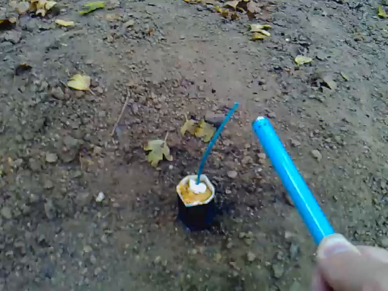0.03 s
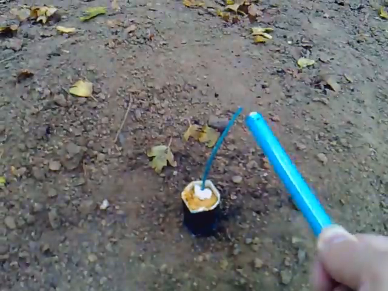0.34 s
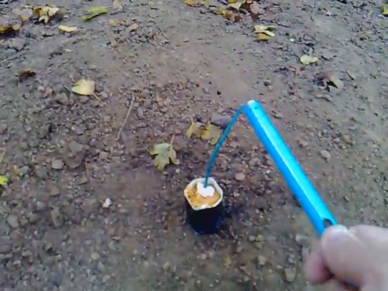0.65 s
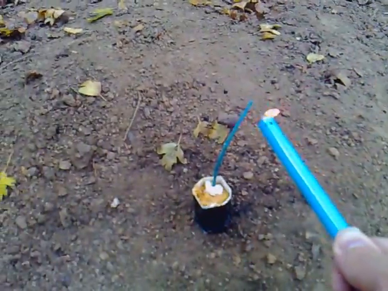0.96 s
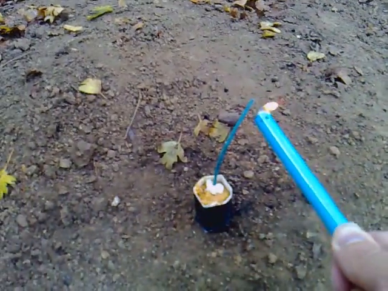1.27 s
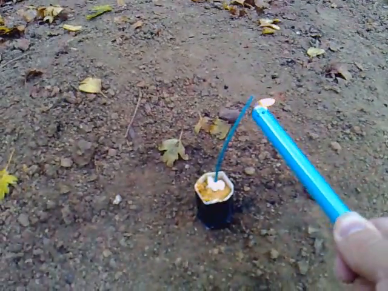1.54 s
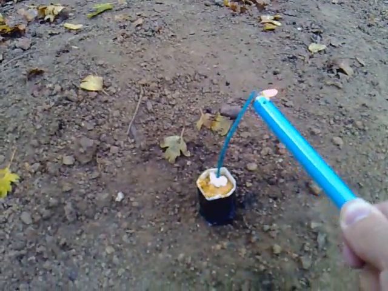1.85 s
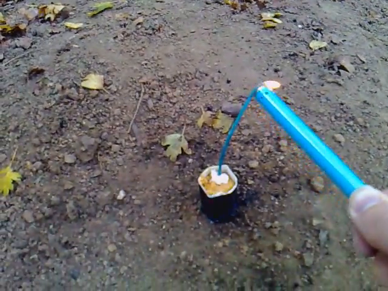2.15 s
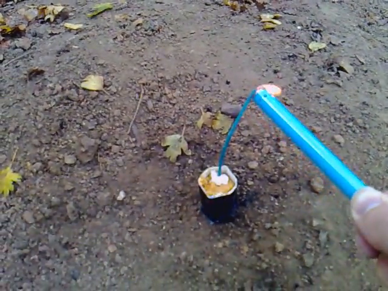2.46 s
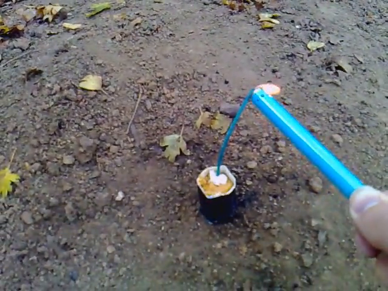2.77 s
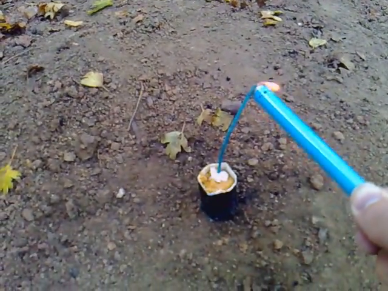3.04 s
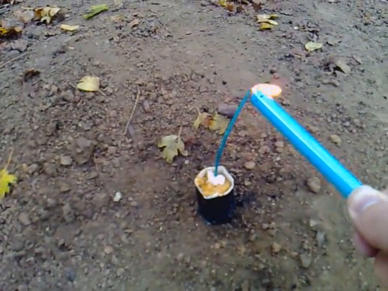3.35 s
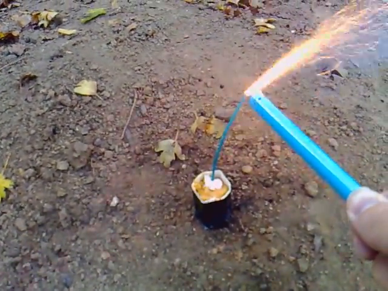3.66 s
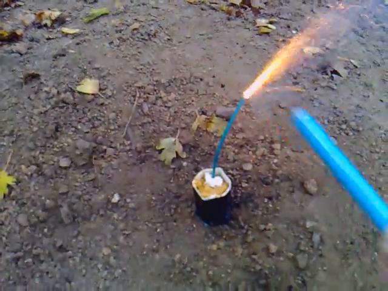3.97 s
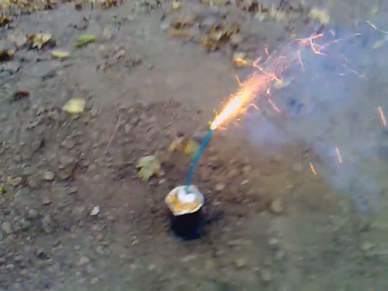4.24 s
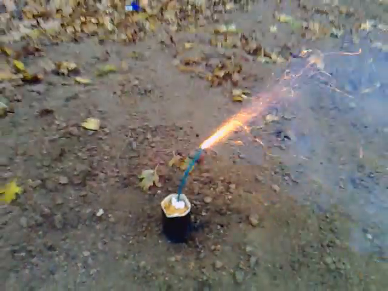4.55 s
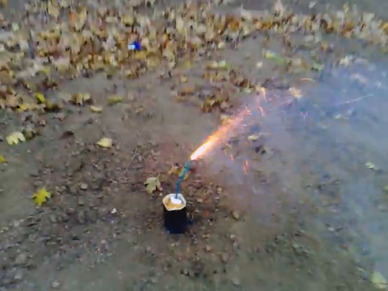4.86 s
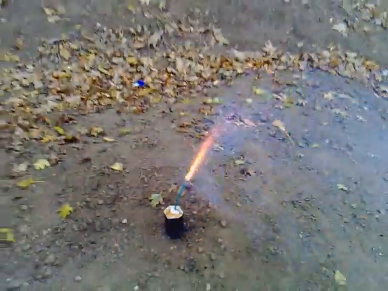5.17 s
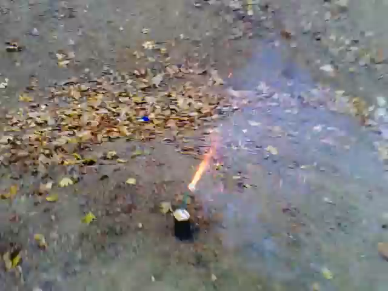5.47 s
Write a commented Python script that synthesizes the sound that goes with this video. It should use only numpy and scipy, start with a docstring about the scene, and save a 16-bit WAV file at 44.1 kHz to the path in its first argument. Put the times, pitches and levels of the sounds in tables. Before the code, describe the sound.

Outdoors, one sharp lighter snap is followed by small crackles, then a smoke bomb's fuse flares into a strong, bright hiss.

```python
"""Lighting a smoke bomb

A long-necked lighter snaps alight, its body ringing, and is held to the fuse of a smoke bomb on bare
earth. Powder grains pop in brief spits; then the fuse catches and its gas jet hisses over a low roar.
The ground echo interferes with the direct sound and gives it a hollow colour. As the small mono
microphone backs away through faint outdoor rumble, the hiss fades and that colour slides upward."""
import sys
import numpy as np
from scipy import signal
from scipy.fft import rfft, irfft
from scipy.io import wavfile
from scipy.ndimage import uniform_filter1d, minimum_filter1d, map_coordinates

SR = 44100
rng = np.random.default_rng(int(sys.argv[2]) if len(sys.argv) > 2 else 0)


def digitize_waveform(pressure):
    """Quantize a signal to 16-bit integers and store it at the path in sys.argv[1].

    Rows of a 2-D input are taken as channels; values are limited to [-1, 1].
    """
    field = np.atleast_2d(pressure).T
    bounded = np.clip(field, -1, 1)
    quanta = np.round(bounded * 32767).astype(np.int16)
    wavfile.write(sys.argv[1], SR, quanta)


N = 247401
T = np.arange(N) / SR

# Outdoor rumble and microphone hiss: (frequency [Hz], relative spectral level [dB])
AIR_SPECTRUM = [(12, -35), (20, -10.5), (53, -2.5), (181, -11), (247, -14.5), (284, -14), (375, -22),
                (408, -20), (797, -23.5), (1080, -25.5), (1840, -31), (3700, -34), (15800, -25)]
# Soft bands of distant noise: (centre [Hz], width [Hz], level [dB])
DISTANT_BANDS = [(560, 66, -64.5), (1040, 236, -60.5)]
# Thuds and rustles: (time [s], level [dB], duration [s], centre [Hz], width [octaves])
THUD_EVENTS = [(0.511, -41, 0.025, 70, 1), (0.8, -45, 0.0041, 2260, 0.27), (1.762, -52, 0.017, 1700, 0.53),
               (1.815, -52, 0.11, 784, 1.0), (3.631, -33.5, 0.021, 141, 0.57),
               (3.643, -27, 0.0063, 80.5, 0.98), (3.663, -34.5, 0.015, 75, 0.64),
               (3.743, -57.5, 0.11, 2400, 0.27)]
# Blows within the lighter: (time [s], gain [dB], ring time [factor], place [0 catch to 1 igniter])
LIGHTER_BLOWS = [(0.6912, -10, 0.59, 0.028), (0.6932, -19, 0.76, 0.1), (1.0539, 3, 0.96, 0.97),
                 (1.0547, -7.5, 1.0, 0.6)]
# Its modes: (frequency [Hz], level struck at catch [dB], level struck at igniter [dB], T60 [s])
LIGHTER_MODES = [(1430, -22, -23, 0.0085), (1557, -61, -43.5, 0.33), (1900, -19, -20.5, 0.015),
                 (2400, -14, -54, 0.02), (3344, -37, -14, 0.023), (4280, -15.5, -22, 0.012),
                 (4860, -42, -19.5, 0.012), (6840, -24, -14, 0.013), (7550, -28, -23, 0.032),
                 (8400, -16, -13.5, 0.013), (10500, -18, -34, 0.0076), (11460, -13, -38, 0.016),
                 (13030, -24, -8, 0.015), (13200, -12, -21, 0.01), (15000, -17, -16, .008)]
# Distinct spits, the last as the fuse catches: (time [s], level [dB], duration [s])
CLEAR_SPITS = [(2.11, -39, 0.003), (2.118, -36.5, 0.0022), (2.135, -37, 0.0026), (2.222, -44.5, 0.0056),
               (2.254, -43.5, 0.003), (2.383, -44, 0.005), (2.44, -40, 0.0013), (2.632, -42, 0.0027),
               (2.929, -38, 0.011), (2.943, -36, 0.0092), (2.96, -37, 0.0024), (3.034, -42, 0.0021),
               (3.191, -43, 0.0025), (3.304, -37, 0.0094), (3.329, -38.5, 0.013), (3.356, -31.5, 0.0034),
               (3.4255, -38.5, 0.0012), (3.497, -43, 0.018), (3.525, -31.5, 0.0061), (3.604, -37, 0.0069),
               (3.613, -37, 0.02), (3.641, -32, 0.0052), (3.796, -32.5, 0.02)]
# Colour of a spit: (frequency [Hz], relative spectral level [dB])
SPIT_SPECTRUM = [(300, -9), (1000, -11), (2100, -2), (3200, -7), (4300, 0.5), (8000, -4), (12000, 3.5),
                 (15700, -0.5)]
# Lag of the ground echo behind the direct sound: (time [s], delay [ms])
ECHO_DELAY = [(2.0, 0.43), (3.9, 0.47), (4.4, 0.45), (4.65, 0.46), (4.88, 0.433), (5.28, 0.42), (5.6, 0.41)]
# Colour of the jet: (frequency [Hz], relative spectral level near [dB], the same far [dB])
JET_SPECTRUM = [(296, -29, -18.5), (965, -13.5, -12.5), (1650, -9.5, -8.5), (2100, -2, -0.5),
                (3460, -6.5, -5), (4450, 0, 0), (5700, -4.5, -2.5), (6470, -3, -3), (7600, -5, -4),
                (9470, -3, -1.5), (12100, 3, 5.5), (14000, 0, 2), (15400, -8.5, -4)]
# Contour that drives the jet's surges, distance loss included: (time [s], nominal level [dB])
HISS_CONTOUR = [(3.825, -21), (3.903, -19), (4.091, -20), (4.169, -22), (4.303, -19), (4.337, -24),
                (4.431, -21), (4.471, -24), (4.535, -20), (4.693, -27), (4.733, -24), (5.005, -31),
                (5.093, -27), (5.169, -31), (5.183, -28), (5.495, -28), (5.513, -31), (5.6, -28)]
# Colour of the flame's roar: (frequency [Hz], relative spectral level [dB])
ROAR_SPECTRUM = [(40, -37), (150, -9), (300, -2.5), (600, 2), (1000, 1.5), (1500, -3), (3000, -26)]

HEAT_S, IGNITION_S = 1.9, 3.7945  # the fuse starts to heat; it catches
RETREAT_S, RETREAT_LENGTH_S, RETREAT_LOSS_DB = 4.42, 0.73, 7
EDGE_HZ = 15830  # upper band limit


def outdoor_air(level_db=-44.5, near_db=1.22, far_db=-2, waver_db=0.5):
    """Background noise: steady hiss, bands like far traffic, and a rumble that eases with the retreat."""
    wash = colour(rng.standard_normal(N), AIR_SPECTRUM)
    rumble = signal.sosfiltfilt(signal.butter(2, 1400, fs=SR, output="sos"), wash)
    hiss = wash - rumble
    f, noise = np.fft.rfftfreq(N, 1 / SR), rfft(rng.standard_normal(N))
    bands = sum(gain_of(db) * unit_rms(irfft(noise * np.exp(-2 * ((f - hz) / width) ** 2), N))
                for hz, width, db in DISTANT_BANDS)
    rumble_db = near_db + (far_db - near_db) * retreat() + waver_db * wander(rate_hz=9.7)
    return gain_of(level_db) * (hiss + rumble * gain_of(rumble_db)) + bands


def thuds():
    """Soft excitation gives swells of band noise: the grip shifts, the flame puffs as the fuse spits."""
    out, octave = np.zeros(N), np.log2(np.fft.rfftfreq(N, 1 / SR) + 1)
    for s, db, length, hz, width in THUD_EVENTS:
        band = np.exp(-0.5 * ((octave - np.log2(hz)) / width) ** 2)
        noise = irfft(rfft(rng.standard_normal(N)) * band, N)
        swell = np.exp(-2 * ((T - s) / length) ** 2)
        out += gain_of(db) * noise * swell * np.linalg.norm(swell) / np.linalg.norm(noise * swell)
    return out


def lighter(crack_db=-14, crack_t60=0.018, yard_db=-42, yard_t60=0.41, attack_s=0.00025):
    """Impact excitation: sprung blows crack and ring the plastic's modes; the yard scatters a tail."""
    out, t = np.zeros(N), np.arange(SR // 3) / SR
    crack_spectrum = [(500, -31), (1500, -5), (7000, 1), (14000, 5.5)]
    yard_spectrum = [(1000, -8), (4500, -5), (6500, -3), (9500, -4), (12500, 5), (15500, -5)]
    for s, db, ring, place in LIGHTER_BLOWS:
        body = np.zeros(len(t))
        for k, (hz, catch_db, igniter_db, t60) in enumerate(LIGHTER_MODES):
            mode_db = np.interp(place, [0, 1], [catch_db, igniter_db]) - 60 * t / (t60 * ring)
            body += gain_of(mode_db) * (-1) ** k * np.sin(2 * np.pi * hz * t)
        crack = colour(rng.standard_normal(len(t)), crack_spectrum)
        crack *= gain_of(crack_db - 60 * t / crack_t60)
        tail = colour(rng.standard_normal(len(t)), yard_spectrum)
        tail *= gain_of(yard_db - 60 * t / yard_t60)
        add(out, s, gain_of(db) * (body + crack + tail) * (1 - np.exp(-t / attack_s)))
    return out


def powder_pops(per_s, spread_db):
    """Shot noise: grains burst independently, a few much larger than the rest."""
    size = gain_of(spread_db * np.minimum(rng.exponential(1, N), 4))
    return unit_rms(size * rng.choice([-1, 1], N) * (rng.random(N) < per_s / SR))


def heating_ticks(per_s=5.5, level_db=-47.5, spread_db=8, length_s=0.0019):
    """A random point process: faint spits of the heating fuse, as rows like CLEAR_SPITS."""
    gaps, strengths, lengths = rng.random((60, 3)).T
    times = HEAT_S + np.cumsum(0.25 + 1.5 * gaps) / per_s
    return [(s, level_db + spread_db * (2 * strength - 1), length_s * (0.5 + length))
            for s, strength, length in zip(times, strengths, lengths) if s < IGNITION_S]


def fuse_spits(fizz_db=-12, fizz_t60=0.35):
    """Superposed impulses: each spit is a tapering cluster of pops whose fizz decays exponentially."""
    out, grains = np.zeros(N), powder_pops(per_s=12000, spread_db=3)
    for s, db, length in CLEAR_SPITS + heating_ticks():
        cluster = grains[round(s * SR):][:max(round(length * SR), 40)]
        add(out, s, gain_of(db) * unit_rms(cluster * np.linspace(1, 0.6, len(cluster))))
    power_decay = gain_of(-60 * np.arange(SR // 6) / SR / fizz_t60) ** 2
    fizz_power = abs(signal.fftconvolve(out ** 2, power_decay / power_decay.sum())[:N])
    fizz = np.sqrt(fizz_power) * rng.standard_normal(N)
    return colour(out + gain_of(fizz_db) * fizz, SPIT_SPECTRUM)


def ground_reflection(direct, reflectance=0.48, dull_hz=6500, glint_hz=9000, glint_lag_ms=0.068):
    """Comb filtering: a dulled echo and a later glint of treble interfere with the direct sound."""
    f, spectrum = np.fft.rfftfreq(N, 1 / SR), rfft(direct)
    delay_ms = curve(ECHO_DELAY)
    echo = irfft(spectrum * reflectance / np.sqrt(1 + (f / dull_hz) ** 4), N)
    glint = irfft(spectrum / np.sqrt(1 + (glint_hz / (f + 1)) ** 8), N)
    glint *= np.interp(retreat(), [0, 1], [0.15, 0.38])
    return direct + delayed(echo, delay_ms) + delayed(glint, delay_ms + glint_lag_ms)


def burning_fuse(grain_share=0.25, steady_db=-20.5, flare_s=0.078, jet_rise_s=0.031, roar_rise_s=0.024):
    """Jet and combustion noise: gas full of bursting grains flares and surges over the flame's roar."""
    distance, age = retreat(), np.maximum(T - IGNITION_S, 0)
    loss_db = RETREAT_LOSS_DB * distance
    flare = age / flare_s * np.exp(1 - age / flare_s)
    # departure from an even burn, as heard close by
    surge_db = curve(HISS_CONTOUR) + loss_db - steady_db + 0.83 * wander(rate_hz=32)
    gas = np.sqrt(1 - grain_share) * rng.standard_normal(N)
    gas += np.sqrt(grain_share) * powder_pops(per_s=6000, spread_db=3)
    near = colour(gas, [(hz, db) for hz, db, _ in JET_SPECTRUM])
    far = colour(gas, [(hz, db) for hz, _, db in JET_SPECTRUM])
    jet = (1 - distance) * near + distance * far
    # the treble beams along the jet, so it follows the surges more than the body does
    treble = signal.sosfiltfilt(signal.butter(3, 8500, "high", fs=SR, output="sos"), jet)
    top = unit_rms(treble) * gain_of(-23 - 4 * flare + 1.3 * surge_db)
    body = unit_rms(jet - treble) * gain_of(-26.5 + 2.5 * flare + 0.64 * surge_db)
    hiss = (top + body) * np.minimum(age / jet_rise_s, 1)
    # the roar swells with the flare and thins when the jet surges
    roar_db = -40.5 + 10 * flare - 0.39 * surge_db + 1.1 * wander(rate_hz=110)
    roar = colour(powder_pops(per_s=4000, spread_db=2), ROAR_SPECTRUM)
    roar *= gain_of(roar_db) * np.minimum(age / roar_rise_s, 1) ** 2
    return gain_of(-loss_db) * (hiss + roar)


def retreat():
    """Uniform motion: the microphone backs away from 0 (near) to 1 (far)."""
    return np.clip((T - RETREAT_S) / RETREAT_LENGTH_S, 0, 1)


def colour(x, points):
    """Spectral shaping by (frequency [Hz], level [dB]) points; white noise keeps its power."""
    hz, db = np.transpose(points)
    f = np.fft.rfftfreq(len(x), 1 / SR)
    response = gain_of(np.interp(np.log(f + 1), np.log(hz), db)) * (f < EDGE_HZ)
    return irfft(rfft(x) * unit_rms(response), len(x))


def wander(rate_hz):
    """Random modulation: low-passed noise of unit rms."""
    f = np.fft.rfftfreq(N, 1 / SR)
    return unit_rms(irfft(rfft(rng.standard_normal(N)) / (1 + (f / rate_hz) ** 4), N))


def curve(rows):
    """Linear interpolation of (time, value) rows at every sample."""
    return np.interp(T, *np.transpose(rows))


def delayed(x, ms):
    """Propagation delay along a path of changing length."""
    return map_coordinates(x, [np.arange(N) - ms / 1000 * SR], order=5)


def gain_of(db):
    """Amplitude ratio of a level in decibels."""
    return 10 ** (np.asarray(db) / 20)


def unit_rms(x):
    """Normalisation to unit power."""
    return x / np.sqrt(np.mean(x ** 2) + 1e-20)


def add(mix, s, sound):
    """Superposition of a sound starting at time s."""
    part = mix[max(round(s * SR), 0):][:len(sound)]
    part += sound[:len(part)]


def scene():
    """Superposition at one microphone: fuse with ground echo, lighter, thuds and outdoor air."""
    fade_in = np.clip((T - 0.065) / 0.15, 0, 1)
    fuse = ground_reflection(fuse_spits() + burning_fuse())
    mono = fuse + lighter() + thuds() + fade_in * outdoor_air()
    return np.array([mono, mono])


def record(dry, limit_db=-16, slope=0.49, hold_s=0.42, smooth_s=0.048, ceiling=0.75):
    """Automatic gain control ducks at the snap, holds and recovers; saturation and a band limit follow."""
    power_db = 10 * np.log10(abs(uniform_filter1d(dry[0] ** 2, size=130)) + 1e-12)
    over_db, hold = np.maximum(power_db - limit_db, 0), round(hold_s * SR)
    held_db = -minimum_filter1d(-over_db, hold, origin=(hold - 1) // 2)  # peak over the last hold_s
    pole = np.exp(-1 / (smooth_s * SR))
    ducked = dry / gain_of(slope * signal.lfilter([1 - pole], [1, -pole], held_db))
    clipped = ducked / (1 + (ducked / ceiling) ** 6) ** (1 / 6)
    low_pass = signal.firwin(511, EDGE_HZ, window=("kaiser", 9), fs=SR)
    return signal.oaconvolve(clipped, low_pass[None], "same", axes=1)


dry = scene()
out = record(dry)
digitize_waveform(out)
```